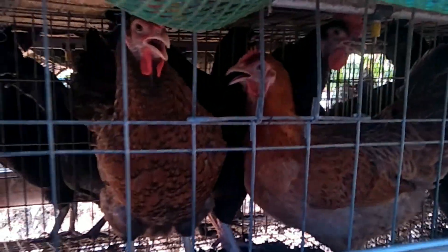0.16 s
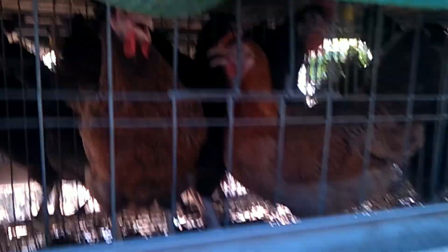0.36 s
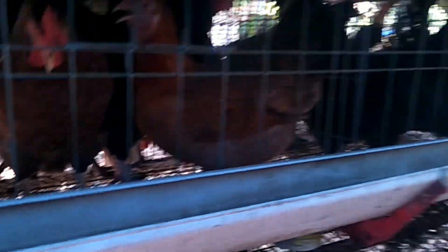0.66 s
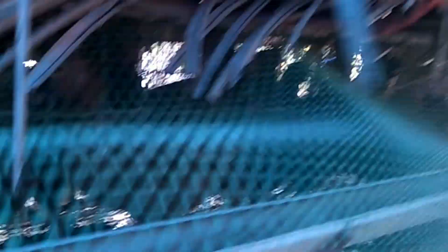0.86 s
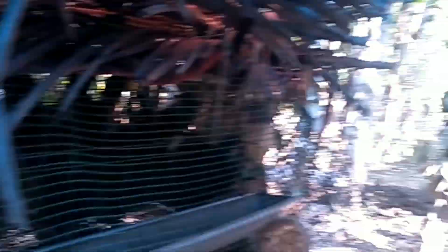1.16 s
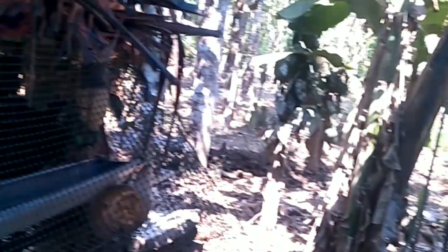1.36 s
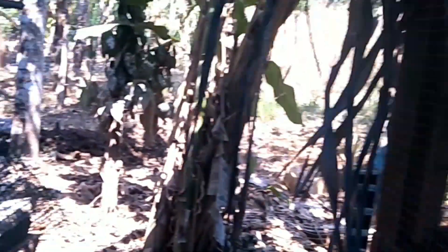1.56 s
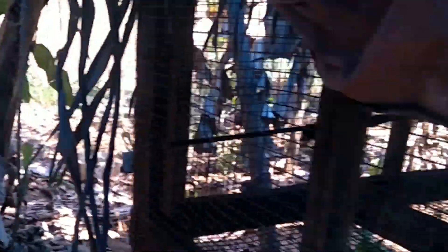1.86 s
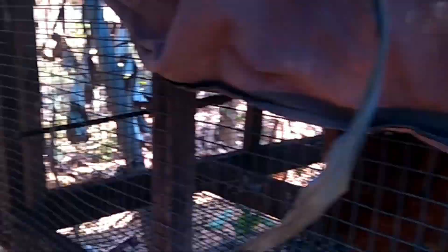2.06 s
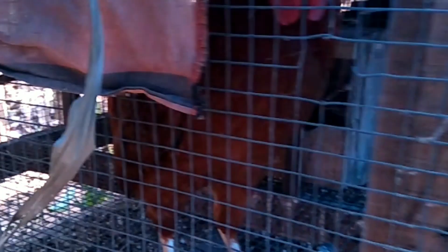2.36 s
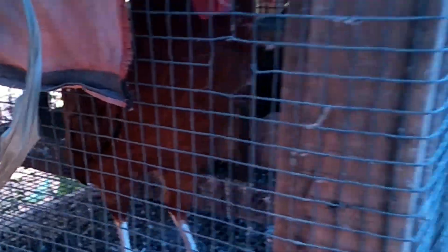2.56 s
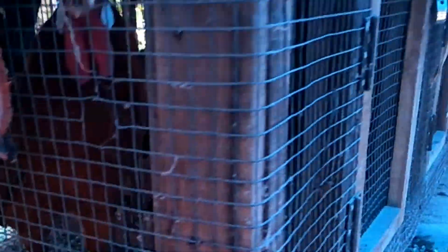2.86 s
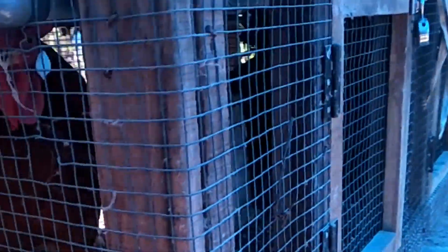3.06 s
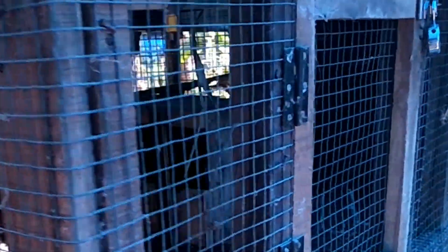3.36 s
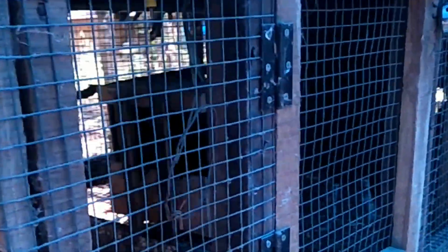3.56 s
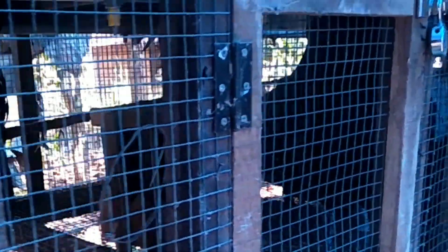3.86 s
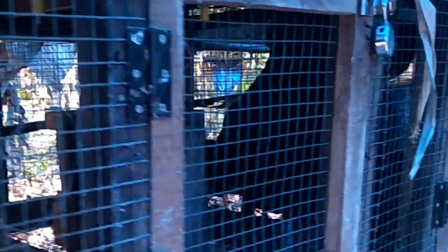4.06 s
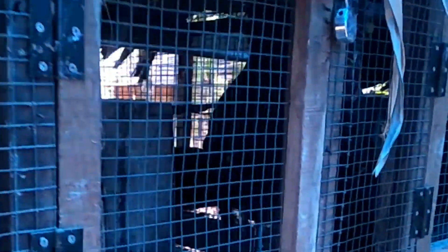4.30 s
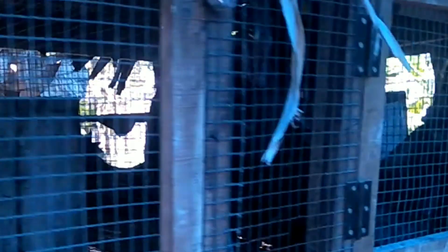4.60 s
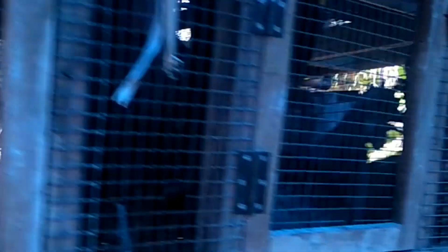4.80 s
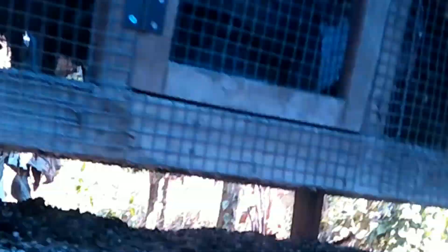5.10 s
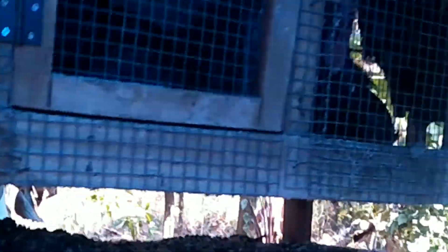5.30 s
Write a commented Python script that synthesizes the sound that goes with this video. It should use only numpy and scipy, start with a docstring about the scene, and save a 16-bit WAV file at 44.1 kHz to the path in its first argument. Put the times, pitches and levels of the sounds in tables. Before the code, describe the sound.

Close dry rustling and crunching, hard wooden knocks, sparse short clucks, and finally a hen's rising, wailing call joined by another hen.

```python
"""Hens cluck in a wooden coop with wire mesh, heard from close by, outdoors: pulses through throat and beak.
One hen starts a raspy whine that clears into a loud drawn-out call, built of partials; a second joins it.
Dry litter and feathers rustle and crunch: coloured snaps and noise that swell and settle.
The boards knock and thump as ringing modes; faint thin notes, a low moan and handling rumble lie behind."""
import sys
import numpy as np
from scipy import signal
from scipy.fft import rfft, irfft
from scipy.io import wavfile
from scipy.ndimage import uniform_filter1d

SR = 44100
rng = np.random.default_rng(int(sys.argv[2]) if len(sys.argv) > 2 else 0)


def wav_record(signal):
    """Record a signal, one row per channel, as 16-bit PCM in the file named by sys.argv[1]."""
    frames = np.transpose(np.atleast_2d(signal))
    bounded = np.clip(frames, -1, 1)
    # unit amplitude maps onto the largest positive 16-bit level
    quanta = np.round(bounded * 32767).astype(np.int16)
    wavfile.write(sys.argv[1], SR, quanta)


N = 239766
TIME = np.arange(N) / SR

# colour of the dry rustle: (frequency [Hz], level [dB])
RUSTLE_SPECTRUM = [(300, -53.5), (900, -45), (1300, -14.5), (1700, -2.5), (2400, 3.5), (3200, 1),
                   (4000, -7), (5000, -23), (7000, -36.5), (15000, -74)]
# colour of low scraping and scuffing: (frequency [Hz], level [dB])
SCRAPE_SPECTRUM = [(150, -13.5), (400, -5.5), (600, -8), (900, 2.5), (1400, 2), (2000, -3), (3000, -2.5),
                   (8000, -65)]
# colour of the fine treble hiss: (frequency [Hz], level [dB])
HISS_SPECTRUM = [(2000, -11.5), (4500, 7.5), (6500, -0.5), (9000, -3), (13000, -3), (15500, -6.5)]
# course of the first hen's raspy start: (time [s], pitch [Hz], effort [dB], upper partials [dB])
GRUMBLE = [(4.24, 657.6, -35, -10), (4.285, 558.6, -36, -14), (4.318, 511, -28, -16), (4.35, 520, -24, -26)]
# course of her whine: (time [s], pitch [Hz], effort [dB], upper partials [dB])
COMPLAINT = [(4.45, 855, -44, -11), (4.56, 801, -33.5, -9), (4.69, 650, -35.5, -10),
             (4.79, 621.5, -31, -2.5), (4.83, 576, -22.5, -12.5), (4.93, 553.3, -31.5, -4.5)]
# course of her loud drawn-out call: (time [s], pitch [Hz], effort [dB], upper partials [dB])
WAIL = [(4.935, 587, -25, -9), (5.0, 553, -31, -11), (5.06, 553.3, -28.5, -0.5), (5.15, 558.5, -29, 2.5),
        (5.21, 582, -22.5, 1), (5.31, 587, -21.5, 5), (5.335, 605, -17.5, -6), (5.375, 612, -18.5, -0.5),
        (5.44, 589.3, -17, -10.5)]
# course of the second hen's call: (time [s], pitch [Hz], effort [dB], upper partials [dB])
ANSWER = [(5.232, 675, -25.5, -28), (5.265, 761, -19, -11.5), (5.36, 767, -22, -28), (5.44, 820, -19, -20)]


def amp(db):
    """Decibels to gain."""
    return 10 ** (np.asarray(db) / 20)


def unit(x):
    """Scales to rms 1."""
    return x / np.sqrt(np.mean(x ** 2) + 1e-20)


def read(points, hz):
    """Reads a spectrum table on a log-frequency axis."""
    f, value = np.transpose(points)
    return np.interp(np.log(hz + 1), np.log(f + 1), value)


def curves(rows, t):
    """Every column of a time table at the times t."""
    s, *columns = np.transpose(rows)
    return [np.interp(t, s, column) for column in columns]


def add(mix, s, sound):
    """Mixes a sound in at s seconds."""
    part = mix[max(round(s * SR), 0):][:len(sound)]
    part += sound[:len(part)]


def colour(x, points, shift=1):
    """Gives x a spectrum, its frequencies multiplied by shift, at rms 1."""
    hz = np.fft.rfftfreq(len(x), 1 / SR)
    gain = amp(read(points, hz / shift))
    return unit(irfft(rfft(x) * gain, len(x)))


def wander(size, hz):
    """Smooth chance up to about hz, cut from a longer stretch of rms 1."""
    f = np.fft.rfftfreq(size + SR, 1 / SR)
    spectrum = rfft(rng.standard_normal(size + SR)) * np.exp(-(f / hz) ** 2)
    return unit(irfft(spectrum))[:size]


def ring(x, hz, width):
    """A two-pole resonance of peak gain 1, its width in Hz."""
    return signal.lfilter(*signal.iirpeak(hz, hz / width, fs=SR), x)


def grains(size, per_s, spread_db):
    """Tiny snaps of very unequal size at random moments."""
    sizes = amp(spread_db * np.minimum(rng.exponential(1, size), 4))
    struck = rng.random(size) < per_s / SR
    return unit(rng.standard_normal(size) * sizes * struck)


def rumble():
    """Lumpy low noise of a microphone carried by hand."""
    # strength of the handling, before a common gain: (time [s], relative level [dB])
    handling = [(0.0, -63), (0.33, -65.5), (0.94, -70), (1.15, -55), (2.09, -62.5), (2.35, -56),
                (2.82, -53.5), (2.98, -54.5), (3.36, -69.5), (3.68, -56), (3.89, -77.5), (4.16, -70),
                (4.3, -54), (5.44, -62.5)]
    # its colour: (frequency [Hz], level [dB])
    rumble_spectrum = [(15, -20), (40, 1.5), (100, 9), (170, 0.5), (260, -14), (380, -16.5), (550, -38),
                       (1200, -39.5)]
    db, = curves(handling, TIME)
    lumpy = rng.standard_normal(N) * amp(4.03 * wander(N, 22))
    return amp(db + 12.5) * colour(lumpy, rumble_spectrum)


def stirring():
    """Strength of rustle and of scrape: the shuffles swell, hold and settle, and their powers add."""
    # a hen shifts her feet and feathers, before the layer gains of the litter:
    # (start [s], length [s], relative rustle level [dB], relative low scrape level [dB])
    shuffles = [(0.103, 0.18, -41, -68), (0.228, 0.078, -31, -45), (0.376, 0.27, -30, -63),
                (0.611, 0.062, -23.5, -34), (0.739, 0.16, -31, -45), (0.951, 0.099, -40.5, -32.5),
                (1.16, 0.1, -33.5, -39), (1.413, 0.077, -39, -40.5), (1.636, 0.12, -41, -44.5),
                (1.887, 0.37, -40, -59.5), (2.47, 0.09, -39.5, -56), (2.616, 0.43, -41, -76),
                (2.94, 0.071, -36, -34), (3.078, .19, -33.5, -46.5), (3.29, 0.14, -34.5, -73),
                (3.398, 0.15, -33, -46), (3.58, 0.072, -36.5, -34.5), (4.053, 0.071, -39, -58),
                (4.334, 0.19, -40.5, -29.5), (4.55, 0.097, -59, -34), (4.76, 0.32, -44, -39),
                (5.214, 0.064, -32.5, -61)]
    rise_s, settle_s = 0.054, 0.079
    rustle, scrape = amp(-57.5), amp(-74)  # the litter between shuffles
    for s, length, rustle_db, scrape_db in shuffles:
        swell = np.clip((TIME - s) / rise_s, 0, 1)
        motion = swell * np.exp(-np.maximum(TIME - s - length, 0) / settle_s)
        rustle = np.hypot(rustle, amp(rustle_db) * motion)
        scrape = np.hypot(scrape, amp(scrape_db) * motion)
    return rustle, scrape


def patchy(x, depth_db):
    """Each moment other leaves and feathers move, so the colour shifts in patches."""
    z = signal.stft(x, nperseg=512, noverlap=384)[2]
    field = uniform_filter1d(rng.standard_normal(z.shape), size=4, axis=0)  # smooth over frequency
    field = unit(uniform_filter1d(field, size=14, axis=1))  # and over time
    return signal.istft(z * amp(depth_db * field), nperseg=512, noverlap=384)[1][:len(x)]


def litter():
    """Countless small snaps of dry leaves and feathers, arriving in clumps."""
    # level of the fine treble hiss, before a common gain: (time [s], relative level [dB])
    hiss_level = [(0.0, -68), (0.21, -52.5), (0.39, -50.5), (0.73, -44.5), (1.32, -59), (1.68, -59.5),
                  (2.16, -59), (2.5, -57.5), (2.79, -49), (3.03, -50), (3.5, -54), (3.83, -64.5),
                  (4.85, -69.5), (5.44, -58)]
    rustling, scraping = stirring()
    hiss_db, = curves(hiss_level, TIME)
    clumps = amp(0.5 * wander(N, 35))
    snaps = grains(N, per_s=3500, spread_db=3.1) * clumps + .8 * rng.standard_normal(N)
    rustle = amp(-1.25) * rustling * colour(snaps, RUSTLE_SPECTRUM)
    scrape = amp(-0.8) * scraping * colour(rng.standard_normal(N) * clumps, SCRAPE_SPECTRUM)
    shifting = patchy(rustle + scrape, depth_db=2.2)
    # some hiss stands by itself, some comes with the rustle
    hissing = np.hypot(amp(hiss_db + 1), amp(-22.5) * rustling)
    return shifting + hissing * colour(snaps, HISS_SPECTRUM)


def thin_tone(length, first_hz, last_hz, db, jitter):
    """A faint gliding tone: one sine, wavering in pitch and level."""
    size = int(length * SR)
    glide = np.linspace(first_hz, last_hz, size)
    phase = 2 * np.pi * np.cumsum(glide * (1 + jitter * wander(size, 80))) / SR
    waver = 1 + 0.44 * wander(size, 60)
    return amp(db) * np.sin(phase) * waver * signal.windows.tukey(size, .3)


def crunches(middle_hz=2400, rise_share=.22):
    """Each crunch is a clump of snaps over a low scuff; long ones are lower and swell more slowly."""
    # crunches in the litter and rattles of the mesh: (time [s], level of the rustling body [dB], decay [s],
    # treble snap relative to a common gain [dB], low scuff relative to the body [dB])
    crunch_events = [(0.082, -33.5, 0.0058, 4, -27), (.313, -27.5, 0.0099, -10, -14),
                     (0.347, -23.5, .006, 3.5, -17), (.61, -23, 0.023, 5, -30),
                     (.641, -14.5, 0.0036, 0, -19.5), (.729, -16.5, 0.0038, -8, -29),
                     (.806, -28, 0.037, 9, -7.5), (0.889, -27, 0.0061, 5, -31),
                     (.916, -15.5, 0.0034, 7.5, -40), (0.971, -19.5, 0.004, 5.5, -22),
                     (1.101, -26, .045, 1, 3.5), (1.191, -27, 0.0075, 4.5, -19),
                     (1.563, -16, 0.028, -9.5, -9.5), (1.622, -27.5, 0.037, -3, -1),
                     (1.897, -30.5, 0.0121, -4, -27), (1.938, -30, 0.0242, -18, -18),
                     (2.046, -24.5, 0.038, -2, -19.5), (2.3, -33.5, 0.034, -7, -41),
                     (2.469, -30, 0.025, -0.5, -10.5), (2.951, -32, 0.057, -11, -9),
                     (3.197, -21, 0.018, -3.5, -11), (3.563, -27.5, 0.052, 0, -0.5),
                     (3.858, -31.5, 0.033, -6, -9), (3.995, -42.5, 0.021, 7, -25),
                     (4.053, -34, 0.044, 5, -28), (4.129, -31, .018, -9, -18.5),
                     (4.336, -29, .036, -10, -7), (4.443, -24, 0.029, -17, -3.5),
                     (4.579, -26.5, .014, -30, -7), (4.81, -31, 0.0064, -24, 7.5),
                     (4.928, -28.5, 0.013, -13, -1)]
    typical_hz, typical_s, short_is_high = 2152, 0.028, 0.081  # the last is an exponent
    out, t = np.zeros(N), TIME[:SR // 3]
    for s, db, decay, snap_db, scuff_db in crunch_events:
        hz = typical_hz * (typical_s / decay) ** short_is_high
        snaps = grains(len(t), per_s=18000, spread_db=1.2)
        body = colour(snaps, RUSTLE_SPECTRUM, hz / middle_hz)
        body += amp(snap_db - 17.0) * colour(snaps, HISS_SPECTRUM)
        body += amp(scuff_db) * colour(rng.standard_normal(len(t)), SCRAPE_SPECTRUM)
        rise = rise_share * decay
        envelope = np.minimum(t / rise, 1) * np.exp(-np.maximum(t - rise, 0) / decay)
        add(out, s - rise / 2, amp(db) * body * envelope)
    return out


def boards(clatter_db=-15, clatter_decay=0.054, chatter=0.4, lowest_hz=84):
    """Blows ring the modes, duller with longer contact; all but the perch clatter, bumps only thud."""
    # blows: (time [s], level [dB], contact time [ms], part: 0 floor, 1 wall, 2 perch, 3 mesh frame)
    knocks = [(0.636, -39, 1.1, 1), (0.821, -32.5, 0.4, 2), (1.059, -9, 0.28, 2), (1.102, -18.5, 0.26, 1),
              (1.124, -9.5, 0.83, 1), (1.187, -22.5, 0.093, 1), (1.63, -36.5, .6, 3), (2.045, -39, 1.2, 3),
              (2.765, -41.5, .9, 3), (2.957, -37.5, 0.59, 1), (3.181, -38.5, 1.3, 3), (3.42, -52, .7, 3),
              (3.563, -35.5, 0.3, 3), (3.614, -24, 0.92, 0), (3.618, -26.5, 0.42, 1), (3.654, -41, 0.36, 1),
              (4.133, -34.5, 1.63, 0), (4.333, -23.5, 0.28, 1), (4.34, -9, 0.54, 0)]
    # ringing modes of the floor: (frequency [Hz], level [dB], time to fall 60 dB [s])
    floor_board = [(101.6, -1.5, 0.41), (127, 0.5, 0.076), (153.6, -4, 0.18), (213, -3.5, 0.3),
                   (294, -16, 0.72), (304, -7, 0.041), (406, -11, 0.073), (606, -24.5, 0.46),
                   (708, -3.5, .05), (1060, -16, 0.057)]
    # ringing modes of the wall: (frequency [Hz], level [dB], time to fall 60 dB [s])
    wall_board = [(121, -40, 0.17), (178.2, -4, 0.26), (216, -18, 0.38), (257.3, -8.5, 0.55),
                  (342.6, -19, 0.78), (387, -5.5, 0.27), (575, -16, 0.23), (683, -8.5, 0.048),
                  (1051, -8.5, 0.21), (1232, -1, 0.035)]
    # ringing modes of the solid perch: (frequency [Hz], level [dB], time to fall 60 dB [s])
    perch = [(341, -15, 0.27), (587, -1.5, 0.087), (822, -5, 0.041), (1030, -7.5, 0.036),
             (2570, -20, 0.079)]
    # ringing modes of a mesh-covered frame: (frequency [Hz], level [dB], time to fall 60 dB [s])
    mesh_frame = [(248.4, -7.5, 0.49), (299, -1.5, 0.2), (335, 2, .3), (417, -1.5, 0.29)]
    # colour of the clatter of loose boards: (frequency [Hz], level [dB])
    clatter_spectrum = [(80, -1), (200, -5.5), (420, -2), (700, -6), (1200, -5), (2500, -11), (6000, -29)]
    # dull bumps: (time [s], level [dB], frequency [Hz], length [s])
    bumps = [(2.319, -31, 109.3, 0.022), (4.579, -14.5, 155, 0.02), (4.821, -19, 161, 0.016),
             (4.97, -26.5, 167, 0.021)]
    out, t = np.zeros(N), TIME[:SR]
    for s, db, contact_ms, part in knocks:
        modes = (floor_board, wall_board, perch, mesh_frame)[round(part)]
        rings = np.zeros(SR)
        for hz, level, t60 in modes:
            decay = amp(level - 60 * t / t60) * (1 + chatter * wander(SR, 41))
            rings += decay * np.sin(2 * np.pi * hz * t + chatter * wander(SR, 42))
        clatter = colour(grains(SR, per_s=1500, spread_db=0.5), clatter_spectrum)
        clatter *= np.exp(-t / clatter_decay) * (modes is not perch)
        push = np.hanning(int(contact_ms * SR / 1000) + 3)  # force of the contact
        add(out, s, amp(db) * np.convolve(amp(clatter_db) * clatter - rings, push / push.sum()))
    # keeps the ringing knocks free of deep bass
    out = signal.sosfilt(signal.butter(6, lowest_hz, "highpass", fs=SR, output="sos"), out)
    for s, db, hz, length in bumps:
        u = TIME[:int(length * SR)]
        add(out, s, amp(db) * np.hanning(len(u)) * np.sin(2 * np.pi * hz * u))
    return out


def cluck(length, db, hz, dip, throat_hz, beak_hz, beak_db, top_db, rough):
    """A short burst of uneven pulses, its pitch bent, through throat and beak."""
    top_hz, top_width_hz = 2870, 160  # highest resonance of every cluck
    u = np.linspace(-1, 1, int(length * SR))
    unsteady = (.012 + .14 * rough) * wander(len(u), 220)
    turns = np.cumsum(hz * (1 + dip * (u - .15) ** 2 + unsteady)) / SR
    pulses = unit(sum(np.cos(2 * np.pi * k * turns) / k ** 0.83 for k in range(1, 9)))
    # breath noise swells with each turn of the pitch
    breath = rng.standard_normal(len(u)) * (1 + np.cos(2 * np.pi * turns))
    drive = pulses + (.1 + 1.2 * rough) * breath
    throat = unit(ring(ring(drive, throat_hz, 480), throat_hz, 550))
    beak = unit(ring(ring(drive, beak_hz, 400), beak_hz, 290))
    top = unit(ring(ring(drive, top_hz, top_width_hz), top_hz, top_width_hz))
    voice = throat + amp(beak_db) * beak + amp(top_db) * top
    # the smoother the cluck, the more of its pure fundamental
    voice += amp(-9) * (1 - rough) ** 3 * np.sin(2 * np.pi * turns) + amp(-27.0) * pulses
    return amp(db) * unit(voice) * np.cos(u * np.pi / 2).clip(0) ** 1.27


def moan():
    """A faint low moan: a narrow band of noise that wavers around its pitch."""
    # its course: (time [s], pitch [Hz], level [dB])
    far_call = [(2.02, 320.6, -52), (2.07, 347, -39), (2.15, 386, -48.5), (2.3, 395, -43.5),
                (2.45, 384, -46), (2.7, 370, -68)]
    hz, db = curves(far_call, TIME)
    phase = 2 * np.pi * np.cumsum(hz) / SR
    sounding = 1. * (TIME > far_call[0][0]) * (TIME < far_call[-1][0])
    sounding = uniform_filter1d(sounding, size=900)  # soft edges
    return amp(db) * sounding * (wander(N, 58) * np.cos(phase) + wander(N, 68) * np.sin(phase))


def whine(rows, full_rasp, jitter, flutter, fuzz_db=-15, top_waver_db=4):
    """A held call that clears with effort; rasp shakes its pitch and loudness and smears the partials."""
    # partials of a drawn-out call, low even ones strong: (multiple of the pitch, level [dB])
    partials = [(1, -24), (2, 0), (3, -16.5), (4, 0), (5, -21), (6, -32.5), (7, -25.5), (8, -32), (9, -44),
                (10, -43), (11, -43), (12, -58), (13, -58), (14, -53.5)]
    soft_db, full_db, soft_rasp = -33.5, -22.5, .9  # rasp falls as effort grows from soft to full
    t = np.arange(rows[0][0], rows[-1][0], 1 / SR)
    hz, db, upper_db = curves(rows, t)
    rasp = np.interp(db, [soft_db, full_db], [soft_rasp, full_rasp])
    unsteady = (0.0049 + jitter * rasp) * wander(len(t), 230)
    phase = 2 * np.pi * np.cumsum(hz * (1 + unsteady)) / SR
    voice = np.zeros(len(t))
    for k, (_, partial_db) in enumerate(partials, 1):
        fuzz = amp(fuzz_db) * (.5 + 2 * rasp) * wander(len(t), 360)
        waver_db = top_waver_db * (k > 4) * (wander(len(t), 22) - .5)
        level = amp(partial_db + upper_db * (k > 3) + waver_db)
        voice += level * (np.cos(k * phase) + fuzz * np.sin(k * phase))
    shake = (1 + flutter * rasp * wander(len(t), 190)) / np.sqrt(1 + (flutter * rasp) ** 2)
    fade = np.clip(np.minimum(t - t[0], t[-1] - t) / 0.0044, 0, 1)
    return t[0], np.sqrt(2) * amp(db) * voice * shake * fade


def hens():
    """All the voices: thin tones, clucks with a slap of echo, the moan and the held calls."""
    # faint thin notes, and high strands of the held calls: (time [s], length [s], first pitch [Hz],
    # last pitch [Hz], level [dB], pitch jitter [share])
    thin_tones = [(0.03, 0.15, 2580, 2100, -47.5, .06), (0.197, 0.12, 847, 830, -54.5, .05),
                  (0.451, 0.17, 1210, 950, -55, .06), (1.434, 0.089, 818, 1024, -52, .023),
                  (1.72, 0.26, 1824, 1956, -44.5, 0.052), (1.925, 0.13, 694, 660, -51.5, .02),
                  (4.935, 0.041, 3470, 3436, -30.5, .02), (5.035, .22, 2400, 2620, -31.5, .05)]
    # clucks: (time [s], length [s], level [dB], pitch [Hz], pitch bend, up at the ends if positive [share],
    # throat resonance [Hz], beak resonance [Hz], beak level [dB], top resonance level [dB], roughness [0-1])
    clucks = [(1.29, .058, -19.5, 425, .2, 718, 1760, -8, -11, 0.09),
              (1.515, 0.0475, -18.5, 436.4, 0.261, 740, 1640, -21, -30, 0.03),
              (2.432, 0.032, -23, 374.6, -0.066, 1444, 2120, -16, -34, 0.01),
              (2.752, .035, -33.5, 349.7, -0.051, 1160, 2130, -8, -17, .22),
              (3.137, 0.037, -31.5, 477, 0.21, 1010, 1450, 1, -20, 0.3),
              (3.793, 0.0466, -16, 479, -0.124, 920, 2460, -14.5, -20.5, .01),
              (3.819, .034, -21, 468, -0.06, 995, 2150, 0, -15, 0.36),
              (4.711, 0.05, -18.5, 404.6, -0.023, 1310, 2650, 0, -16, 0.63)]
    # the drawn-out calls: (course of the call, rasp left at full effort [0-1],
    # pitch jitter per unit of rasp [share], flutter per unit of rasp [share])
    held_calls = [(GRUMBLE, .4, 0.053, 0.7), (COMPLAINT, 0.86, .055, 0.6), (WAIL, 0.025, 0.0574, .75),
                  (ANSWER, 0.89, 0.074, 0.51)]
    slap_s, slap_db = .036, -19  # a wall of the coop throws each cluck back
    out = moan()
    for s, *shape in thin_tones:
        add(out, s, thin_tone(*shape))
    for s, *shape in clucks:
        voice = cluck(*shape)
        add(out, s, voice)
        add(out, s + slap_s, amp(slap_db) * voice)
    for call in held_calls:
        add(out, *whine(*call))
    return out


def coop(x):
    """Short dense reflections from boards and roof, each band dying at its own pace."""
    # decay of the reflections: (frequency [Hz], time to fall 60 dB [s])
    coop_t60 = [(150, 0.28), (1000, .28), (2500, 0.36), (8000, 0.12)]
    size = SR // 2
    signs = rng.choice([-1., 1.], size)
    taps = signs * (rng.random(size) < 2500 / SR) * (TIME[:size] > .004)
    hz, t, z = signal.stft(taps, SR, nperseg=256)
    decay = amp(-60 * t / read(coop_t60, hz)[:, None])
    tail = signal.istft(z * decay, SR, nperseg=256)[1]
    return signal.fftconvolve(x, tail / np.linalg.norm(tail))[:N]


def scene():
    """Voices, blows and crunches with their reflections, over litter and rumble."""
    voices, blows, crunch = hens(), boards(), crunches()
    echo = coop(amp(-13.5) * voices + amp(-14.5) * blows + amp(-11) * crunch)
    return (voices + blows + crunch + echo + litter() + rumble())[None]


def record(dry):
    """A soft ending and the recorder's band limit."""
    edge_hz = 15600
    dry = dry * np.minimum((TIME[-1] - TIME) / .004, 1)
    lowpass = signal.firwin(511, edge_hz, window=("kaiser", 9), fs=SR)
    return signal.oaconvolve(dry, lowpass[None], "same")


dry = scene()
out = record(dry)
wav_record(out)
```